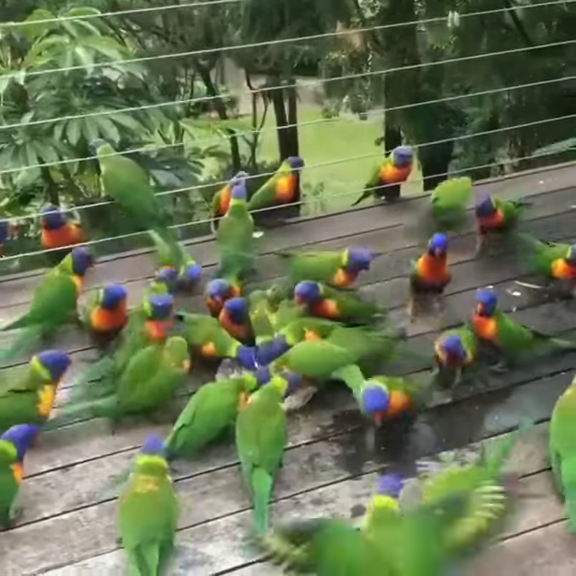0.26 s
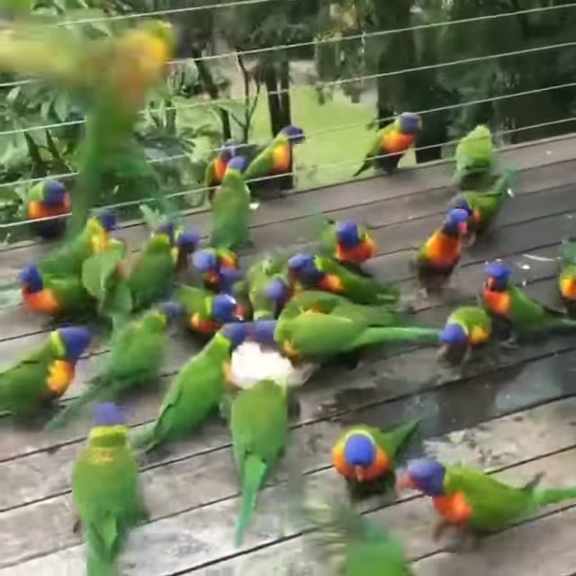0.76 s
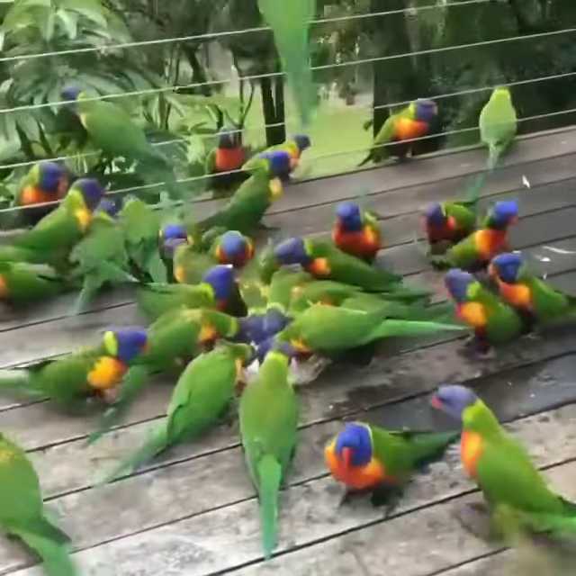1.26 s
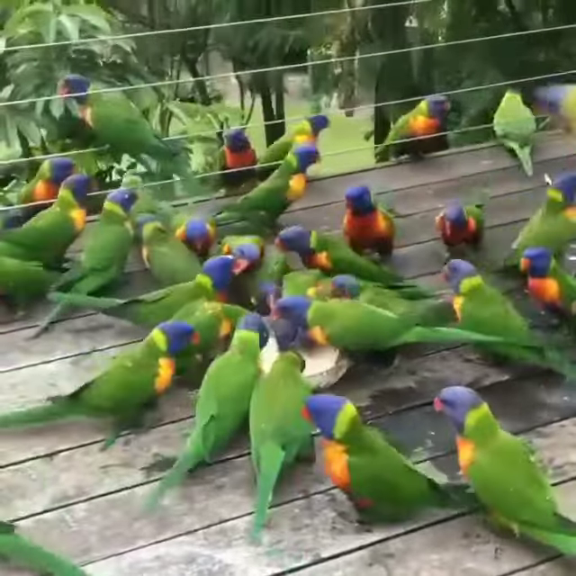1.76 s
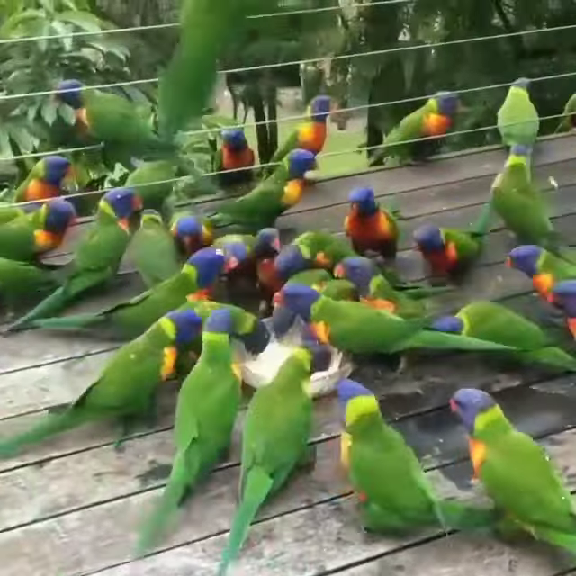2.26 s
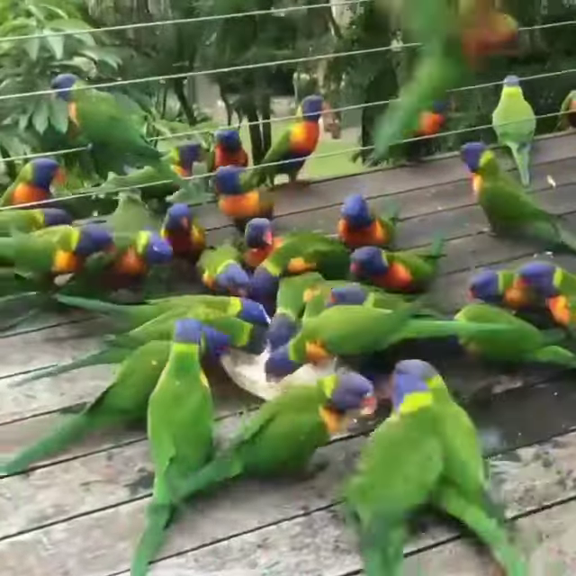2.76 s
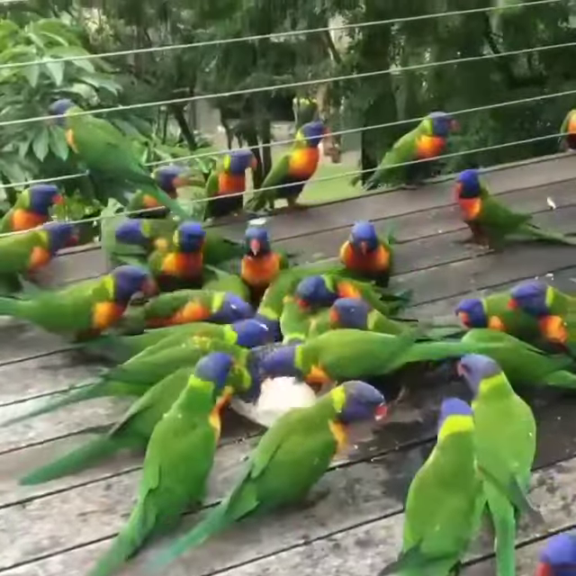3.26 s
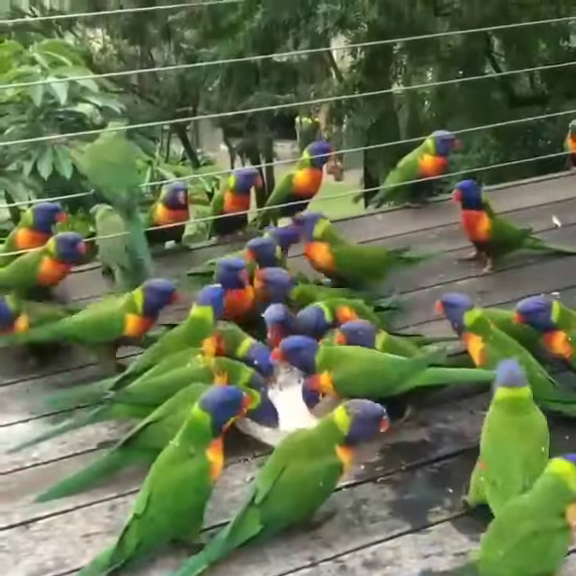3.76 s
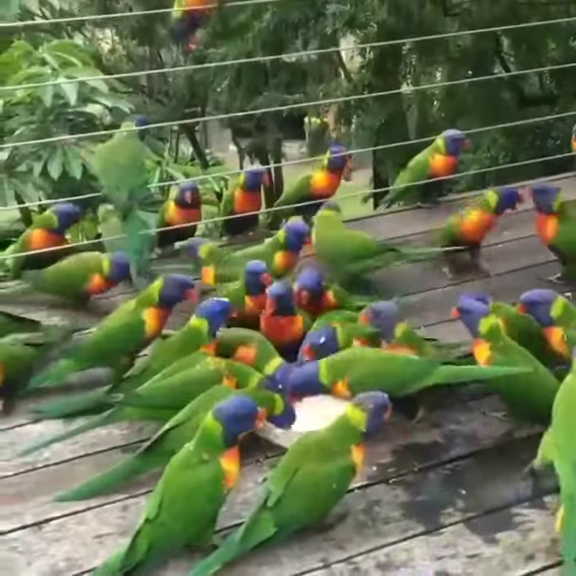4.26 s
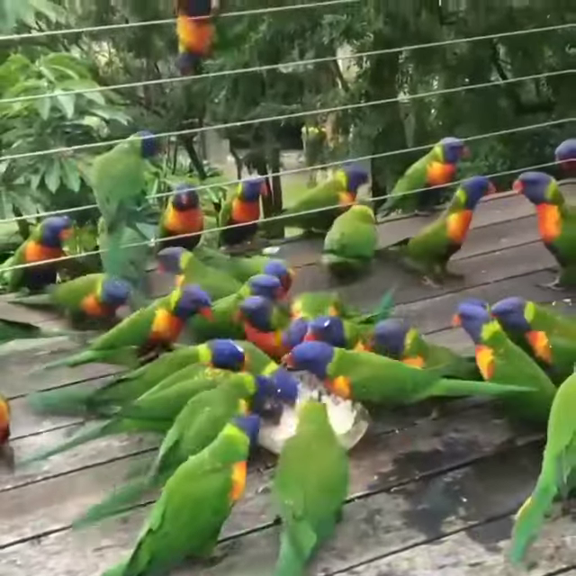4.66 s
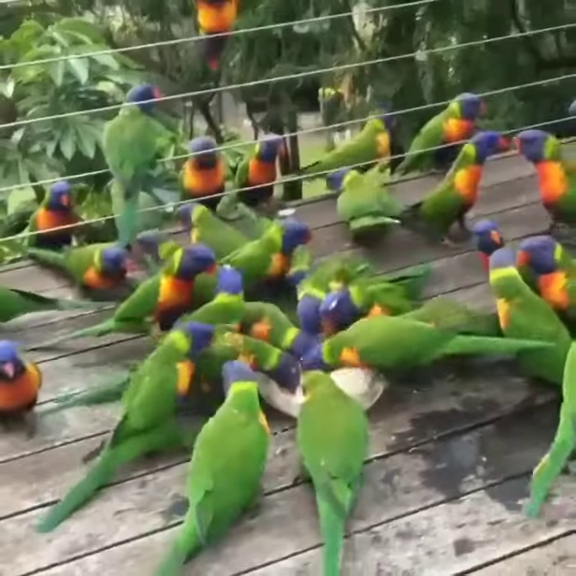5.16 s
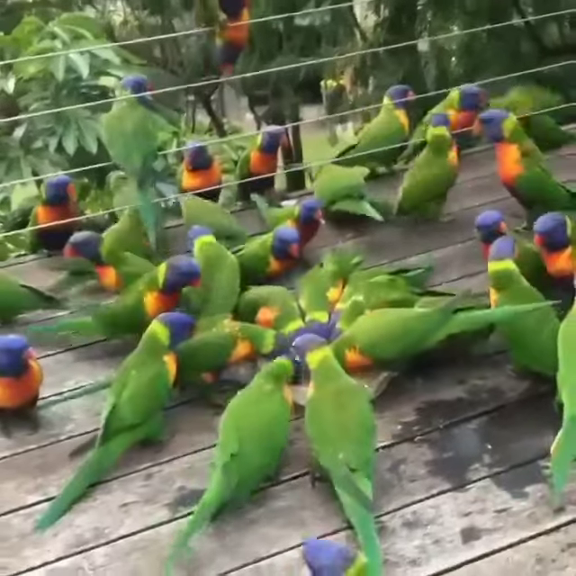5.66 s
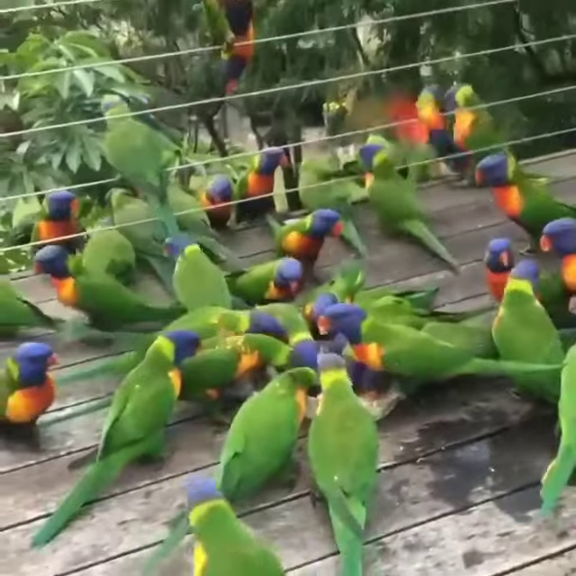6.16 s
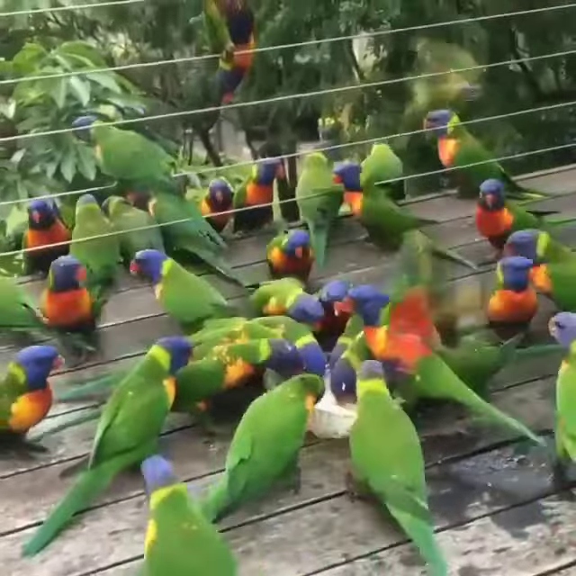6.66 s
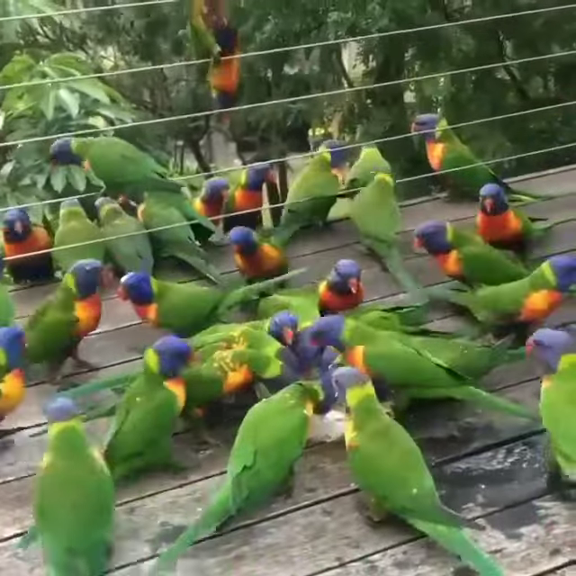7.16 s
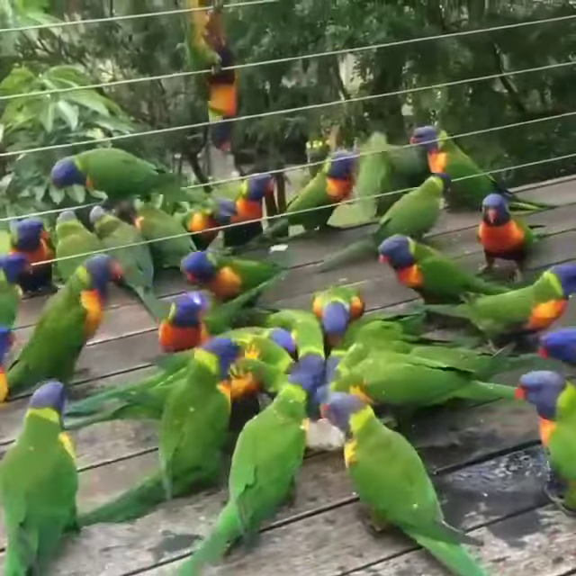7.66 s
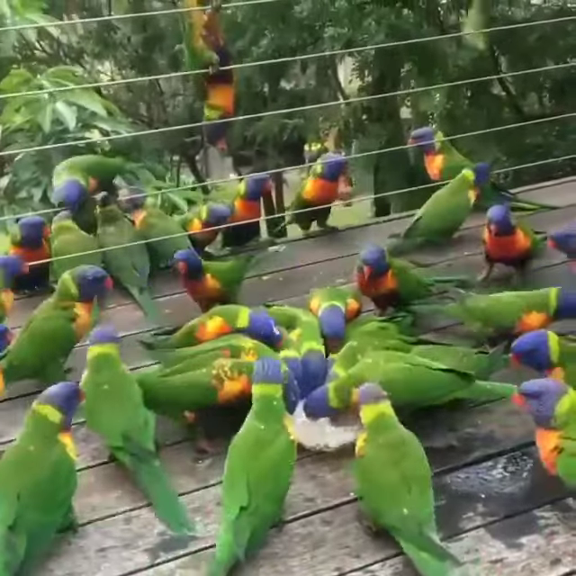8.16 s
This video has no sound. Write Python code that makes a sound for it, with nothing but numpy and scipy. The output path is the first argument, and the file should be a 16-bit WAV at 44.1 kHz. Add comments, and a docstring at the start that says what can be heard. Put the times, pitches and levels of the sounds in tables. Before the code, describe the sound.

A dense flock of small parrots screeches, whistles and chatters nonstop at close range while feeding on an outdoor wooden deck, with soft wing flutter.

```python
"""Small parrots screech and whistle close to the microphone as the flock feeds on a wooden deck.
The harsh buzzing screeches are throbbing stacks of unsteady partials mixed with breath noise.
Clear whistles and quick chatter are gliding tones with an octave; all the near calls echo.
Farther birds blur into a noise haze, wing beats puff low noise, a low hum wavers far off
and a soft outdoor hiss lies underneath."""
import sys
import numpy as np
from scipy import signal
from scipy.fft import rfft, irfft, next_fast_len
from scipy.io import wavfile
from scipy.ndimage import uniform_filter1d, map_coordinates

SR = 44100
rng = np.random.default_rng(int(sys.argv[2]) if len(sys.argv) > 2 else 0)


def digitize_waveform(pressure):
    """Quantize a signal to 16-bit integers and store it at the path in sys.argv[1].

    Rows of a 2-D input are taken as channels; values are limited to [-1, 1].
    """
    field = np.atleast_2d(pressure).T
    bounded = np.clip(field, -1, 1)
    quanta = np.round(bounded * 32767).astype(np.int16)
    wavfile.write(sys.argv[1], SR, quanta)


N = 370440

SHORT_DULL_DB = 9  # short chirps lose this much octave


def amp(db):
    """Gain from dB."""
    return 10 ** (np.asarray(db) / 20)


def unit(x):
    """x at rms 1."""
    return x / np.sqrt(np.mean(x ** 2) + 1e-20)


def curve(rows):
    """One value per sample from (time [s], value) rows."""
    return np.interp(np.arange(N) / SR, *np.transpose(rows))


def wobble(rate, size=N):
    """A smooth random curve through rate random knots a second."""
    knots = rng.standard_normal(int(size * rate / SR) + 4)
    return map_coordinates(knots, [np.arange(size) * rate / SR])


def glide_phase(hz):
    """Phase of a tone that follows a pitch curve."""
    return 2 * np.pi * np.cumsum(hz) / SR


def coloured(x, points):
    """x through a spectrum of (frequency [Hz], level [dB]) points, 120 dB down outside them."""
    m = next_fast_len(N + 8192)
    hz, db = np.transpose(points)
    grid = np.log(np.fft.rfftfreq(m, 1 / SR) + 1)
    gain = amp(np.interp(grid, np.log(hz), db, -120, -120))
    return irfft(rfft(x, m) * gain, m)[:N]


def add(track, s, sound):
    """Mix a sound into the track at time s."""
    part = track[round(s * SR):][:len(sound)]
    part += sound[:len(part)]


def edges(t, rise, fall):
    """Soft start and end of a call."""
    ramp = np.clip(np.minimum(t / rise, (t[-1] - t) / fall), 0, 1)
    return np.sin(np.pi / 2 * ramp) ** 2


def garden():
    """Soft outdoor hiss: steady noise, strongest in the low range."""
    # hiss spectrum: (frequency [Hz], relative level [dB per Hz])
    hiss_spectrum = [(90, -11), (135, -1), (200, -6), (600, -9.5), (1500, -11.5), (14000, -21.5)]
    return amp(-51.5) * unit(coloured(rng.standard_normal(N), hiss_spectrum))


def hum():
    """A faint, fuzzy low tone from far off: a sine unsteady in pitch and level."""
    # course of the hum: (time [s], pitch [Hz], level [dB])
    hum_course = [(2.9, 118.6, -55), (3.9, 134.7, -59), (4.1, 139.8, -72), (4.5, 148.7, -48.5),
                  (4.849, 151, -76), (5.699, 125.7, -55), (7.6, 126, -63), (8.4, 125, -64)]
    s, hz, db = np.transpose(hum_course)
    t = np.arange(N) / SR
    tone = np.sin(glide_phase(np.interp(t, s, hz) * (1 + 0.028 * wobble(20))))
    fade_in = np.clip((t - s[0]) / 0.23, 0, 1)
    return unit(tone * amp(5.1 * wobble(9.9))) * amp(np.interp(t, s, db)) * fade_in


def wings():
    """Low air puffs, one per wing beat, uneven in strength."""
    # loudness of the wings: (time [s], level [dB])
    wing_level = [(0, -60), (.6, -48.5), (1.5, -45), (2.4, -42), (3.2, -52), (4.2, -62), (5.3, -62),
                  (5.8, -57.5), (6.9, -55), (8.4, -57)]
    # colour of the puffs: (frequency [Hz], relative level [dB per Hz])
    flap_spectrum = [(20, -21), (50, 5.5), (80, 6), (180, -10), (350, -18.5), (650, -10), (1000, -26)]
    beat = np.cos(glide_phase(28 * (1 + 0.059 * wobble(2.5))))  # about 28 beats a second
    puffs = rng.standard_normal(N) * amp(7 * beat + 2.5 * wobble(9))
    return amp(curve(wing_level)) * unit(coloured(puffs, flap_spectrum))


def far_flock():
    """Distant calls merge into a haze: noise made patchy in time and frequency."""
    # colour of the haze: (frequency [Hz], relative level [dB per Hz])
    haze_spectrum = [(1200, 3), (2200, 4.5), (3500, -10), (7000, 4.5), (15000, -69)]
    z = signal.stft(rng.standard_normal(N), nperseg=512)[2]
    patches = uniform_filter1d(rng.standard_normal(z.shape), 4, 0)  # smooth across frequency
    patches = uniform_filter1d(patches, 10, 1)  # and along time
    haze = signal.istft(z * amp(11.3 * unit(patches)), nperseg=512)[1][:N]
    return amp(-44.0) * unit(coloured(haze, haze_spectrum))


def surroundings(x):
    """The deck, house wall and trees answer with a short noise tail and a fainter long one."""
    t = np.arange(SR // 2) / SR
    decay = amp(-60 * t / .1) + .14 * amp(-60 * t / .5)  # 60 dB down in 0.1 s and 0.5 s
    tail = rng.standard_normal(len(t)) * decay
    delayed = np.pad(x, (300, 0))  # samples before the answer
    return signal.fftconvolve(delayed, tail / np.linalg.norm(tail))[:N]


def chirp_octave_db(hz):
    """Low notes carry a strong octave, high ones a weak one."""
    octave_db, from_hz, loss_db_per_khz = 1, 3460, 12
    return octave_db - loss_db_per_khz * np.clip(hz - from_hz, 0, None) / 1000


def note(length, pitches_hz, octave_db, waver, flutter_db):
    """A gliding tone with its octave and a faint third partial; overtones fade on the highest notes."""
    t = np.arange(int(length * SR)) / SR
    position = t / t[-1] * (len(pitches_hz) - 1)
    hz = map_coordinates(np.array(pitches_hz, float), [position], order=2, mode="nearest")
    phase = glide_phase(hz * (1 + waver * wobble(150.0, size=len(t))))
    # the octave differs from note to note and flutters on its own
    octave_db = octave_db + rng.normal(0, 2.5) + flutter_db * wobble(87.5, size=len(t))
    overtones = np.sin(2 * phase) + .05 * np.sin(3 * phase)
    tone = np.sin(phase) + amp(octave_db) / (1 + (hz / 3750) ** 12) * overtones
    flutter = amp(flutter_db * wobble(74.7, size=len(t)))
    return np.sqrt(2) * tone * flutter * edges(t, 0.0082, 0.0039)


def chatter(crowd, count=420):
    """Short arched chirps at random, loudest where many birds squabble, faint from the trees."""
    out = np.zeros(N)
    for s, size, pitch, arch, slope, db in rng.random((count, 6)):
        hz = 1800 * 2.6 ** pitch ** 1.4
        start, middle = 1 - 0.1917 * arch, 1 + 0.0447 * slope
        end = 1 + 0.17 * slope - 0.194 * arch
        chirp = note(0.01126 + 0.0309 * size ** 2, hz * np.array([start, middle, end]),
                     chirp_octave_db(hz) - SHORT_DULL_DB, waver=0.013, flutter_db=1.5)
        squabble = crowd[int(s * N):][:len(chirp)].min()
        add(out, s * N / SR, (squabble + amp(-54)) * amp(-4 + 8 * db) * chirp)
    return out


def contour(length, from_hz, to_hz):
    """A straight glide whose pitch sags while the breath builds at the start and fails at the end."""
    scoop, scoop_s, droop, droop_s = 0.0964, 0.00584, 0.08, .004  # shares of the pitch, decay times [s]
    t = np.linspace(0, length, num=32)
    sag = scoop * np.exp(-t / scoop_s) + droop * np.exp((t - length) / droop_s)
    return (from_hz + (to_hz - from_hz) * t / length) * (1 - sag)


def whistles():
    """The clear calls, long and short: gliding tones, unsteadier and duller when faint and far."""
    # whistles without their soft edges:
    # (time [s], length [s], held pitch from [Hz], held pitch to [Hz], level [dB])
    whistle_calls = [(0.008,0.045,1876,2066,-34),(0.051,0.026,2500,2760,-22),(0.077,0.046,3870,3940,-15),(0.105,0.029,3540,3420,-13.5),(0.13,0.023,2460,2560,-16.5),
                     (0.151,0.036,3895,3670,-14),(0.317,0.025,3450,3570,-21.5),(0.344,0.054,2413,2510,-20.5),
                     (0.386,0.033,5110,5530,-14.5),(0.46,0.025,5920,4930,-20),
                     (0.538,0.021,3760,3920,-18),(0.557,0.023,3500,3590,-12.5),(0.651,0.072,4210,4040,-22),(0.583,0.036,2500,2634,-16.5),(0.632,0.093,3550,3597,-20.5),
                     (0.801,0.031,3610,3500,-17),(0.845,.012,3410,3650,-15.5),(0.87,0.009,3650,3370,-14.5),(0.868,0.058,2388,2466,-16),
                     (0.932,0.015,4780,4950,-13.5),(0.958,0.029,2500,2570,-20),(0.986,0.028,2790,2894,-21),(1.017,0.0088,2600,2260,-20),
                     (1.055,0.11,3210,3200,-36),(1.171,0.11,1710,1740,-35),(1.321,0.11,2790,3550,-19.5),(1.39,0.045,3600,3315,-18.5),(1.635,0.036,4520,4510,-23),
                     (1.827,0.13,5410,6440,-22.5),(1.885,0.048,3030,3430,-26),(1.913,0.033,3360,3216,-23),(1.992,0.018,2320,2970,-28),
                     (2.006,0.025,3796,3560,-22.5),(2.121,0.016,1960,2350,-31),(2.14,0.037,3610,2940,-40.5),(2.237,0.041,2350,2080,-32.5),
                     (2.332,0.061,1805,1980,-34.5),(2.495,0.06,2410,2400,-39),
                     (2.546,0.06,2210,2470,-35),(2.598,0.054,2600,3120,-32.5),(2.604,.13,5670,6250,-25),(2.663,0.028,2310,2250,-29.5),(2.686,0.064,3150,3055,-33.5),
                     (2.818,0.076,4160,4230,-28),(2.847,0.062,1586,1644,-30),(2.85,0.028,2300,1930,-27),(2.945,0.023,2480,2530,-27),
                     (2.97,0.063,4350,4520,-23.5),(3.014,0.055,3197,3310,-26.5),(3.143,0.11,3045,3427,-35),
                     (3.386,0.073,2440,3030,-25.5),(3.42,0.055,4030,4480,-20),(3.45,0.012,4340,3750,-11),(3.459,0.036,3205,2980,-14),(3.509,0.054,4310,4446,-6.5),
                     (3.563,0.054,3320,3624,-17.5),(3.592,0.073,3056,3287,-22.5),(3.746,0.1,2434,2566,-29),
                     (3.777,0.057,2980,3150,-28),(3.843,0.042,4210,4150,-19),(3.908,0.015,2560,3120,-20),(4.069,0.037,1283,1390,-35),(4.051,0.11,2200,2597,-38.5),(4.139,0.02,4800,3620,-14),
                     (4.155,0.042,3644,4270,-11.5),(5.383,0.054,3360,3274,-28.5),(4.979,0.065,2256,2330,-24.5),(5.041,0.099,2546,2510,-27),(5.12,0.056,2410,2450,-22.5),(5.45,0.071,3500,3570,-23.5),
                     (5.421,0.037,2187,2460,-23.5),(5.699,0.024,2450,2300,-24.5),(5.76,0.065,2534,2440,-26.5),
                     (5.971,0.047,2436,2420,-26),(6.013,0.066,2692,2629,-26.5),(6.356,0.036,2850,3000,-22),(6.391,0.05,3370,3140,-23.5),
                     (6.775,0.12,3120,3090,-36),(6.882,0.045,3990,4370,-27),(6.852,0.054,2200,1990,-32),
                     (6.87,0.1,5610,7040,-25.5),(6.925,0.069,2730,2560,-28),(6.914,0.05,3150,3410,-26.5),(6.998,0.081,4020,3820,-25),
                     (7.071,0.053,2870,3330,-27.5),(7.125,0.02,2150,2380,-28),(7.165,0.025,2370,2160,-27.5),
                     (7.768,0.077,3470,3447,-35),(8.025,0.076,3380,3050,-29)]
    lead_s, soft_ends_s = .002, 0.0041  # the soft edges start a whistle early and lengthen it
    out = np.zeros(N)
    for s, length, from_hz, to_hz, db in whistle_calls:
        full = length + soft_ends_s
        far_db = max(-27 - db, 0)  # fainter whistles are farther
        octave_db = chirp_octave_db((from_hz + to_hz) / 2) - .7 * far_db
        octave_db -= SHORT_DULL_DB * (length < .036)
        tone = note(full, contour(full, from_hz, to_hz), octave_db,
                    waver=0.0029 + .0008 * far_db, flutter_db=1.5 + .25 * far_db)
        add(out, s - lead_s, amp(db) * tone)
    return out


def lead_call():
    """One loud unbroken whistle yelps, dips, climbs and breaks; its octave sounds on the lower pitches."""
    # course of the call: (time [s], pitch [Hz], level [dB])
    call_course = [(6.462, 4330, -22), (6.482, 4400, -13), (6.489, 3130, -13.5), (6.503, 4360, -12.5),
                   (6.515, 3970, -11.5), (6.545, 4660, -14.5), (6.577, 4640, -12.5), (6.585, 3060, -18),
                   (6.61, 3550, -11), (6.652, 2964, -20)]
    s, hz, db = np.transpose(call_course)
    t = np.arange(int((s[-1] - s[0]) * SR)) / SR
    hz = uniform_filter1d(np.interp(t + s[0], s, hz), size=150)  # round the pitch corners
    phase = glide_phase(hz)
    tone = np.sin(phase) + amp(-4) / (1 + (hz / 3700) ** 40) * np.sin(2 * phase)
    level = amp(np.interp(t + s[0], s, db))
    out = np.zeros(N)
    add(out, s[0], np.sqrt(2) * tone * level * edges(t, 0.0025, 0.018))
    return out


def mouth(x, hz):
    """The open beak lifts one band of a call."""
    lift_db, half_width_hz = 9, 450
    grid = np.fft.rfftfreq(len(x), 1 / SR)
    gain = amp(lift_db / (1 + ((grid - hz) / half_width_hz) ** 2))
    return unit(irfft(rfft(x) * gain, len(x)))


def screeches():
    """An unsteady harmonic voice with breath noise, throbbing 88 times a second or faster when rough."""
    # screeches without their soft edges, roughness counting up to 1: (time [s], length [s],
    # middle pitch [Hz], level [dB], swell over the call [dB], roughness [0-1], mouth resonance [Hz])
    screech_calls = [(0.013, 0.096, 1006, -27, 13, 0.8, 4100), (0.106, 0.12, 1030, -21, -2, 0.66, 4230),
                     (0.238, 0.089, 1320, -25, -4, 0.88, 4130), (0.324, 0.14, 1220, -22.5, 14, 0.6, 2700),
                     (0.466, 0.12, 1101, -22.5, -1, 0.53, 3230), (0.582, 0.32, 1081, -23, -9.5, 1.01, 4000),
                     (0.899, 0.15, 1566, -27.5, -7, 0.37, 5240), (1.209, 0.049, 1082, -31, 8, 0.47, 2100),
                     (1.284, 0.075, 1354, -24.5, 4, 0.33, 6100), (1.499, 0.15, 1515, -30, 10.5, 0.49, 3300),
                     (1.652, 0.2, 1158, -21.5, 7, 1.05, 5970),
                     (1.854, 0.14, 1047, -27.5, -13.5, 0.42, 2880),
                     (2.229, 0.045, 1014, -35, -14, 0.58, 2000), (2.274, 0.11, 985, -41, 8, 0.13, 2070),
                     (2.598, 0.16, 1085, -32.5, -3, 0.43, 5860), (2.896, 0.19, 1280, -28, -13, 0.73, 4350),
                     (3.196, 0.16, 939, -41.5, 5, 0.62, 1930), (3.337, 0.13, 1468, -19.5, 8, 0.75, 2700),
                     (3.491, 0.17, 1450, -25.5, 2, 0.61, 3060), (3.669, 0.16, 1522, -35.2, -9, 1.1, 2210),
                     (3.8, 0.14, 1052, -21, 1.5, 0.67, 3800), (4.038, 0.094, 1240, -26.5, 11, 0.25, 3970),
                     (4.126, 0.12, 1252, -23, -5.5, 0.8, 3640), (4.289, 0.13, 1264, -20.5, 7, 0.59, 3700),
                     (4.502, 0.12, 980, -22.5, 8, 0.58, 5340), (4.676, 0.13, 1171, -23, 6, 0.65, 5940),
                     (4.817, 0.18, 939, -20, 3, 0.91, 7100), (4.995, 0.16, 1118, -22.5, 0, 0.96, 4500),
                     (5.216, 0.14, 1190, -22, 0.5, 0.66, 2160), (5.352, 0.19, 1193, -22, 7.5, 1.02, 3550),
                     (5.542, 0.1287, 1337, -25, 0, 0.48, 5100), (5.666, 0.12, 1104, -24, -12.5, 0.91, 5000),
                     (5.909, 0.1, 1103, -24, -1.5, 0.77, 4308), (6.084, 0.11, 1014, -22.5, -5, 0.72, 7200),
                     (6.198, 0.13, 1202, -23, -1, 0.87, 5360), (6.326, 0.17, 1284, -21.5, 5, 0.64, 3100),
                     (6.664, 0.073, 1213, -28.5, -2.5, 0.67, 2030),
                     (6.917, 0.32, 1112, -35, 4.5, 0.39, 2950), (7.424, 0.071, 1069, -28, -3, 0.72, 5140),
                     (7.568, 0.13, 1368, -24, 1.5, 0.42, 5510), (7.707, 0.021, 1450, -20.5, 1, 0.1, 3080),
                     (7.73, 0.021, 1352, -22, 6, 0.42, 3940), (7.856, 0.07, 1280, -34, 6, 0.36, 7060),
                     (7.935, 0.11, 1454, -20, 0.5, 0.01, 3100), (8.18, 0.11, 1551, -20.5, 12.5, 0.37, 3100),
                     (8.294, 0.089, 1212, -31.5, -1, 0.02, 2420)]
    # colour shared by all the voices: (frequency [Hz], relative level [dB per Hz])
    throat_spectrum = [(350, -24), (600, -13.5), (941, -7.5), (1670, -6.5), (2250, 3.5), (3680, 3),
                       (6790, 0.5), (8450, -12.5), (10100, -3), (15600, -27.5)]
    voice, level, crowd = np.zeros(N), np.zeros(N), np.zeros(N)
    for s, length, pitch_hz, db, swell_db, rough, mouth_hz in screech_calls:
        t = np.arange(int((length + 0.012) * SR)) / SR
        size, rough = len(t), np.clip(rough, 0, 1)
        beat = glide_phase((88 + 70 * rough) * (1 + 0.1274 * wobble(24.44, size)))
        # the pitch scoops up at the start and within each throb; a rough voice also scatters it
        scoop = -.11 * np.exp(-t / .022) - .02 * np.sin(beat) + .03 * wobble(22, size)
        scatter = .037 * rough * wobble(400, size)
        climb_hz = 300.4 * (t - t[-1] / 2)  # every screech climbs slowly, in Hz per second
        phase = glide_phase((pitch_hz + climb_hz) * (1 + scoop + scatter))
        stack = np.zeros(size)
        for k in range(1, 14):
            # every partial flutters on its own, which widens it into a band
            flutter = amp(2.5 * wobble(14, size)) * (1 + (.25 + .8 * rough) * wobble(300, size))
            stack += min(k * 0.74, 1) * flutter * np.cos(k * phase + k * k)
        breath = .06 + .4 * rough ** 1.5  # share of the power
        source = np.sqrt(1 - breath) * unit(stack) + np.sqrt(breath) * rng.standard_normal(size)
        throb = unit(amp((4 - 2.5 * rough) * np.cos(beat) + 1.4 * wobble(30, size)))
        add(voice, s - .004, mouth(source, mouth_hz) * throb * edges(t, 0.002, 0.0028))
        gain = amp(db + swell_db * (t / t[-1] - .5)) * edges(t, 0.0076 + 0.015 * rough, 0.021)
        add(level, s - .004, gain)
        add(crowd, s, rough * gain)
    voice = unit(coloured(voice, throat_spectrum))
    treble = coloured(voice, [(3500, -30), (6500, 0), (16000, 0)])
    # faint calls come from farther off and lose their treble
    nearness = np.clip(level / amp(-28.5), 0, 1) ** .5
    return level * (voice - (1 - nearness) * treble), crowd


def scene():
    """All birds, their echo and the background."""
    harsh, crowd = screeches()
    birds = harsh + whistles() + lead_call() + chatter(crowd)
    echo = amp(-10) * surroundings(birds)
    return (birds + echo + far_flock() + wings() + garden() + hum())[None]


def record(dry):
    """Peaks round off near full scale; a steep band limit cuts the extreme lows and top treble."""
    soft = dry[0] / (1 + np.abs(dry[0]) ** 6) ** (1 / 6)
    return coloured(soft, [(5, 0), (15760, 0)])[None]


dry = scene()
out = record(dry)
digitize_waveform(out)
```